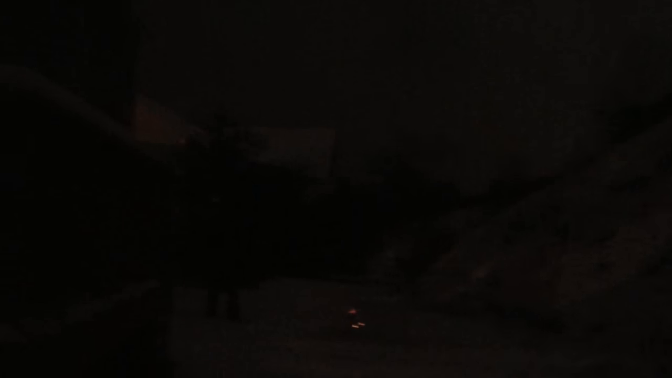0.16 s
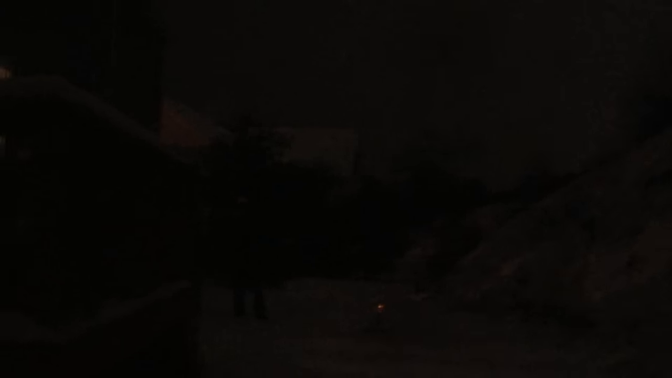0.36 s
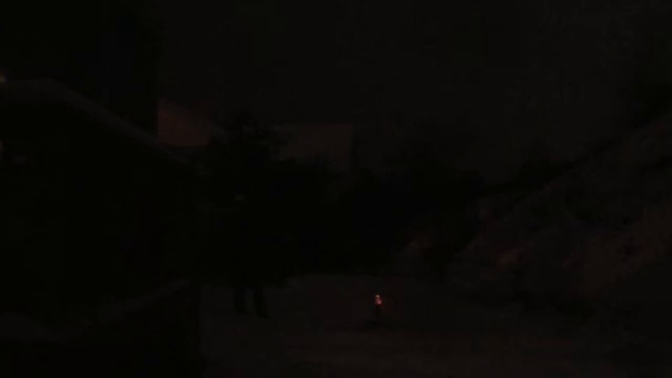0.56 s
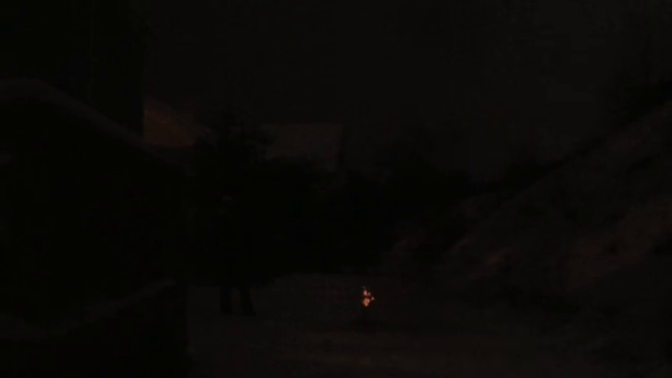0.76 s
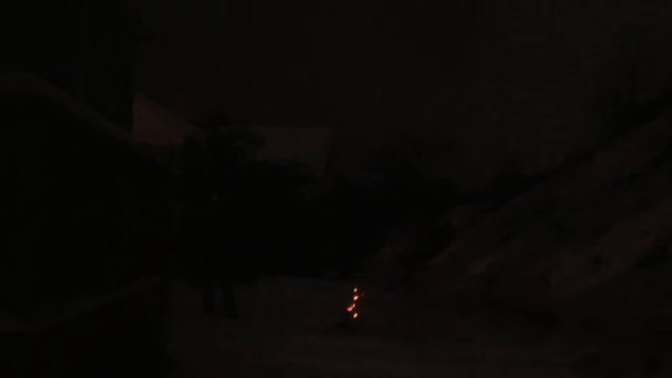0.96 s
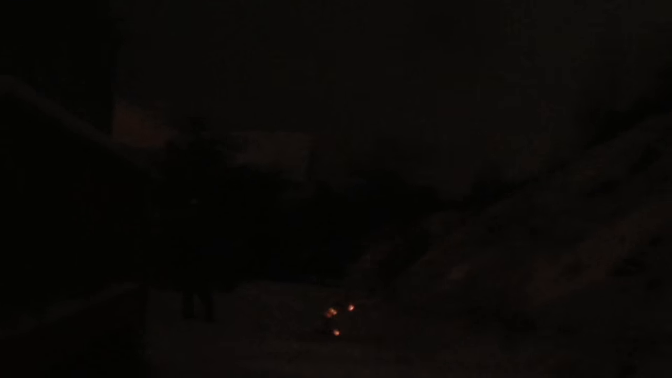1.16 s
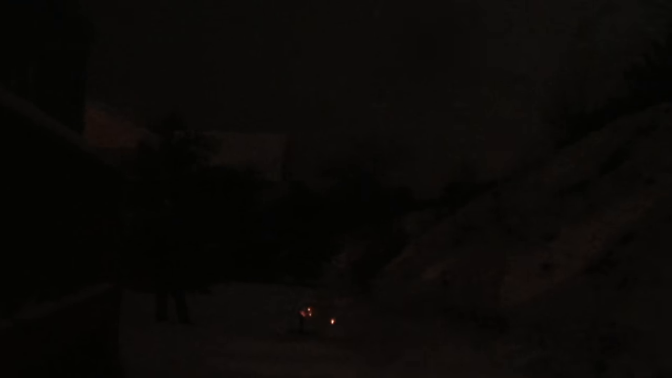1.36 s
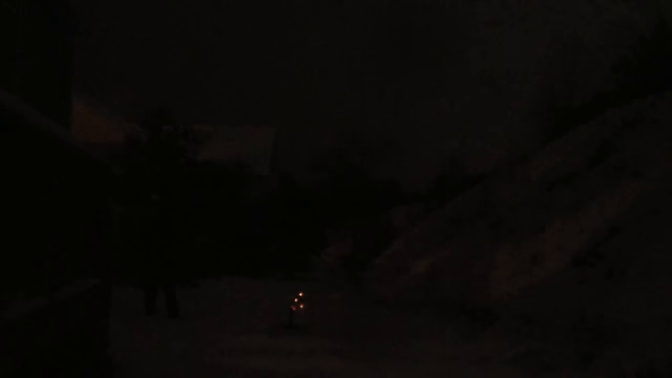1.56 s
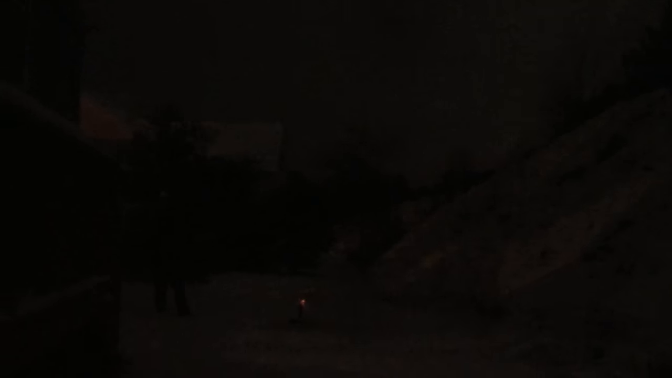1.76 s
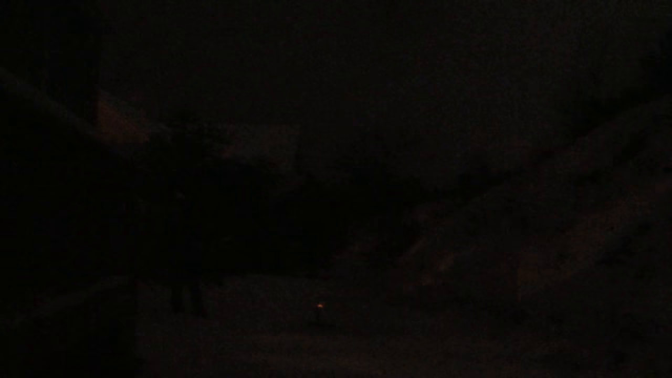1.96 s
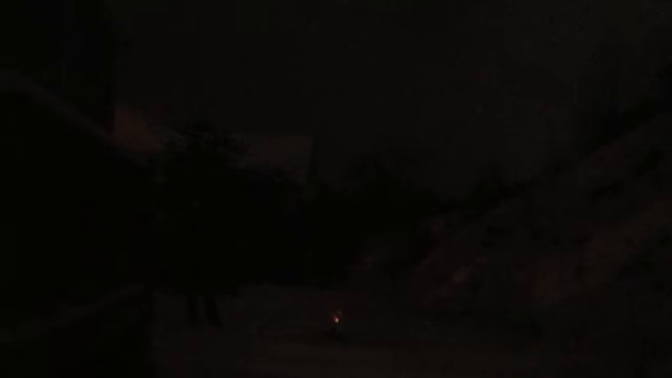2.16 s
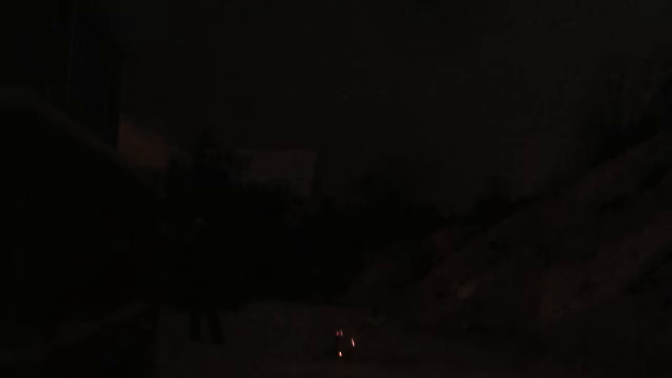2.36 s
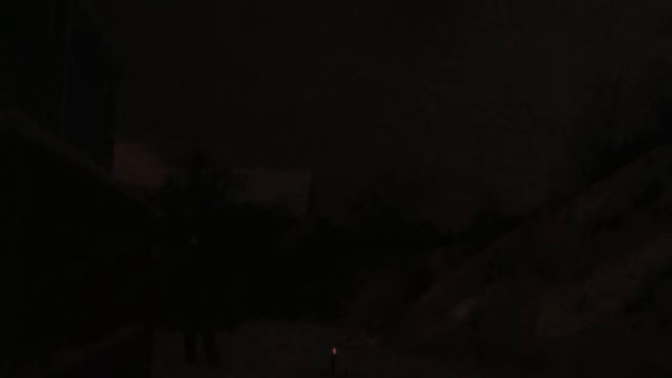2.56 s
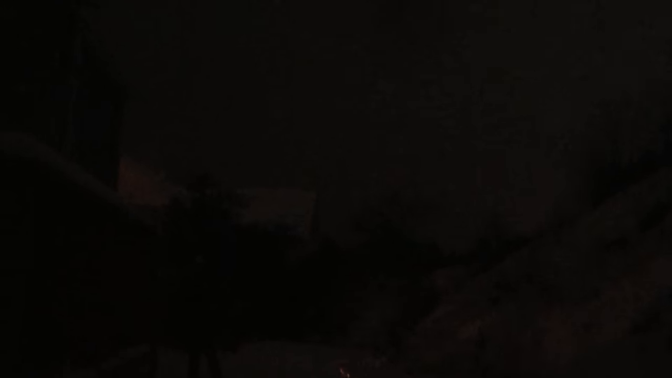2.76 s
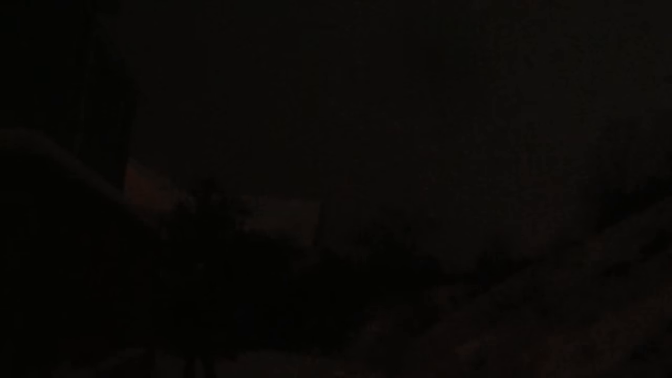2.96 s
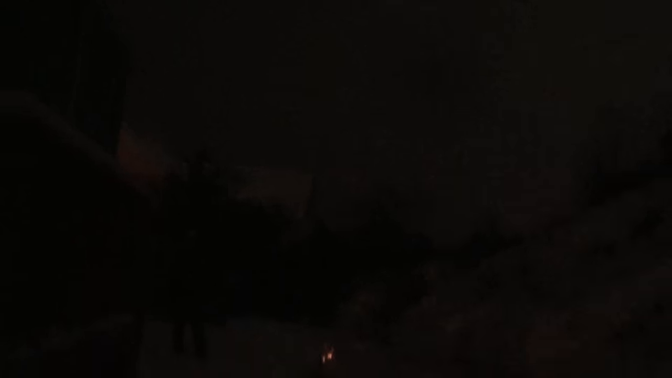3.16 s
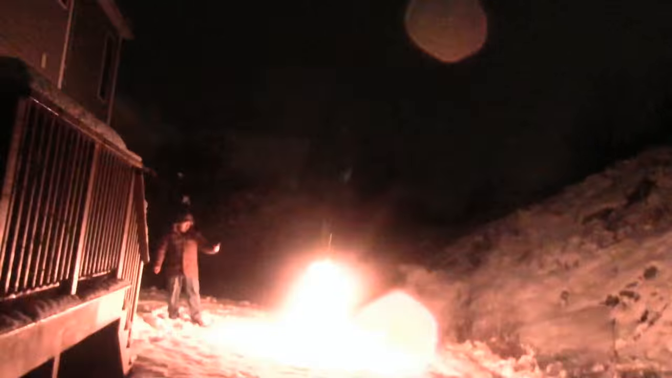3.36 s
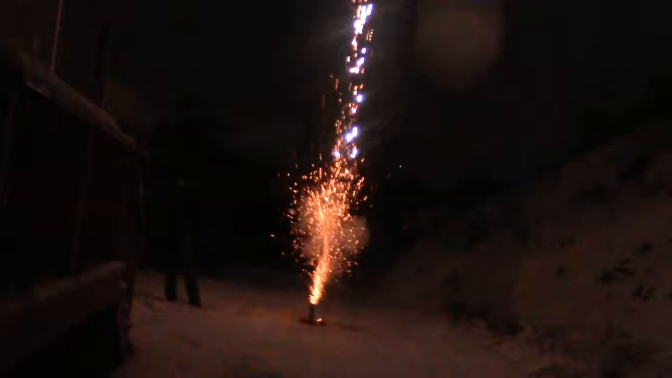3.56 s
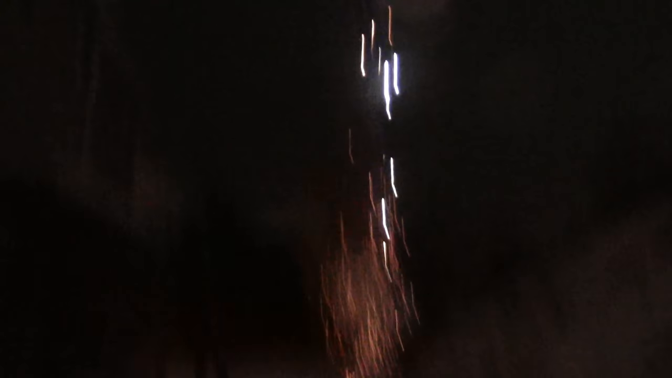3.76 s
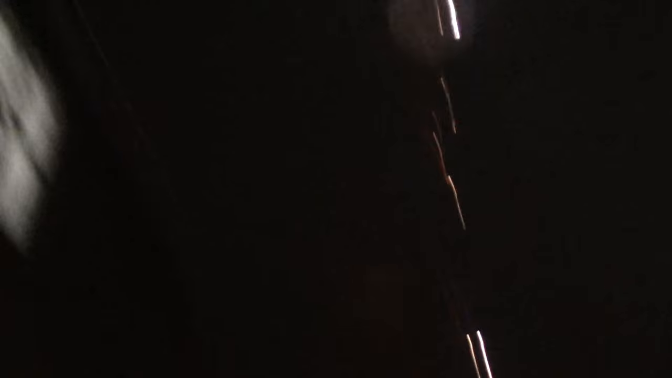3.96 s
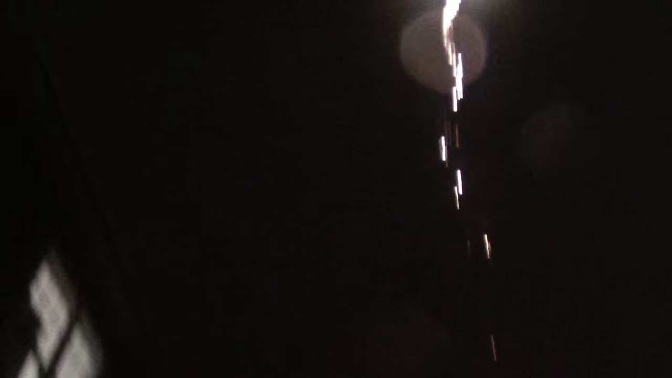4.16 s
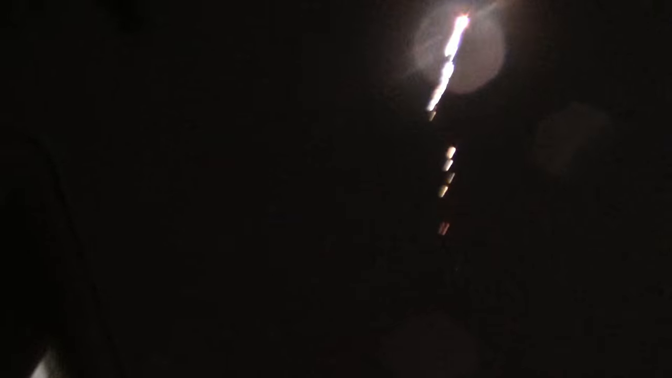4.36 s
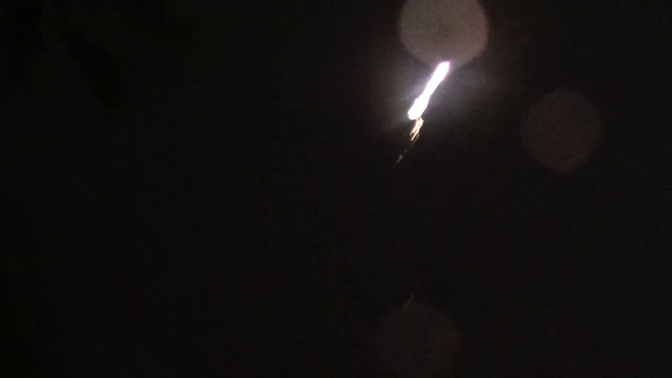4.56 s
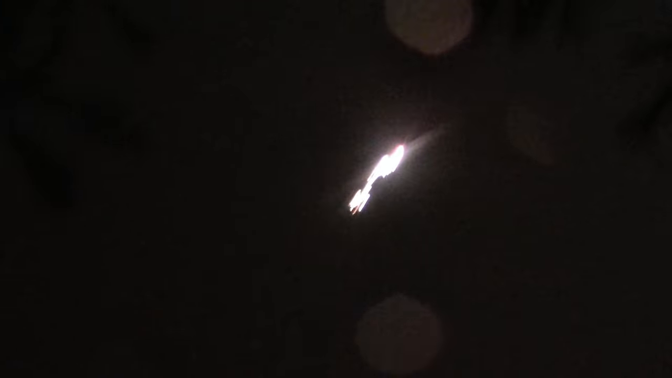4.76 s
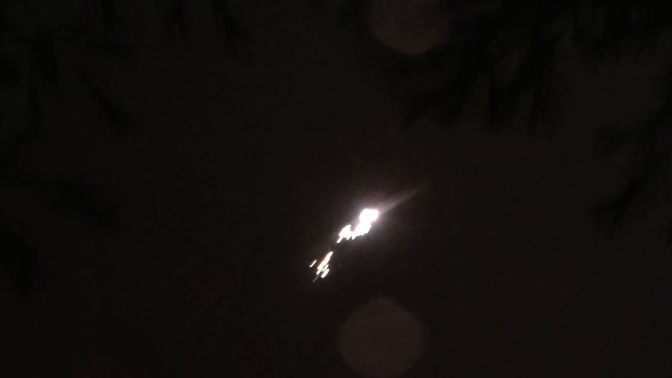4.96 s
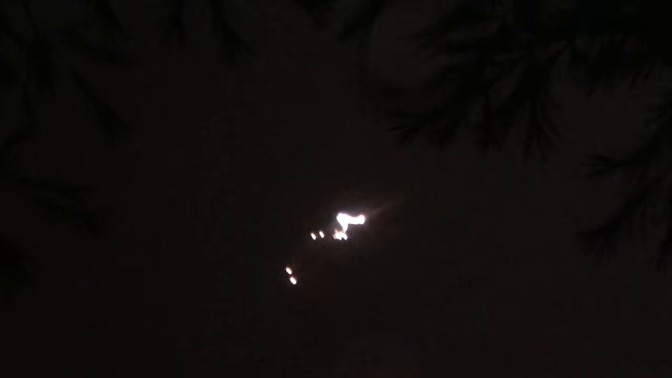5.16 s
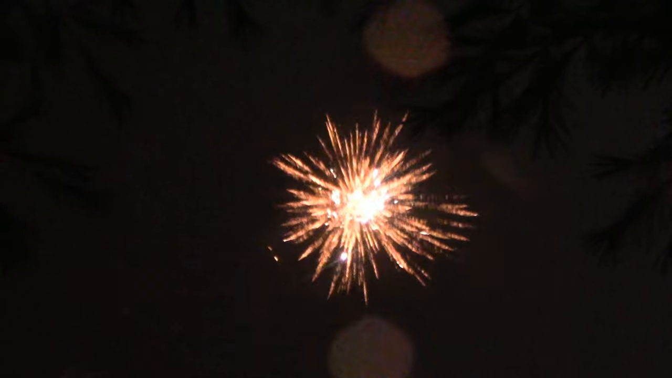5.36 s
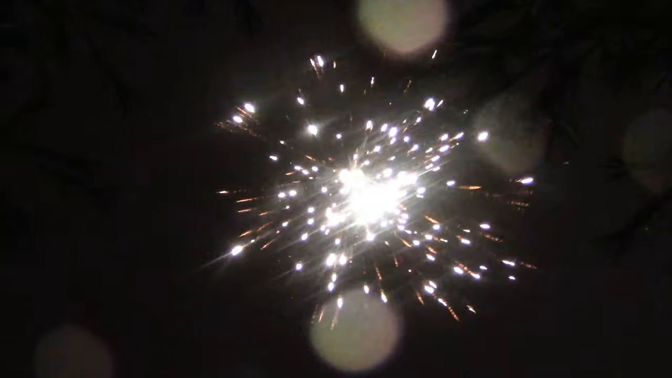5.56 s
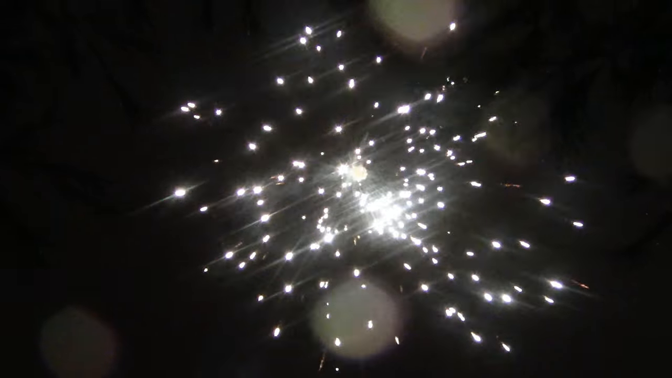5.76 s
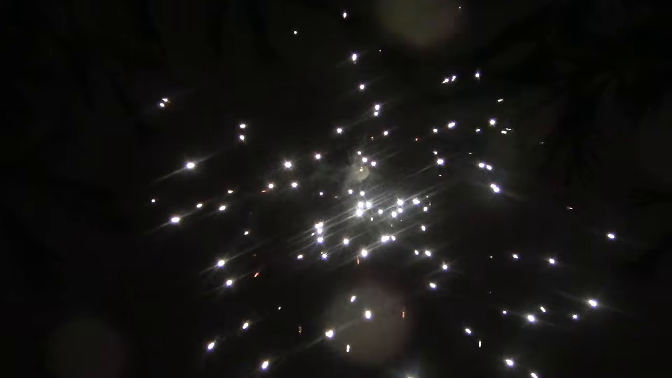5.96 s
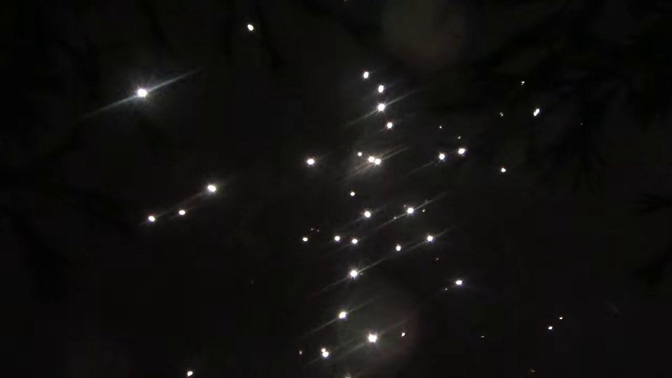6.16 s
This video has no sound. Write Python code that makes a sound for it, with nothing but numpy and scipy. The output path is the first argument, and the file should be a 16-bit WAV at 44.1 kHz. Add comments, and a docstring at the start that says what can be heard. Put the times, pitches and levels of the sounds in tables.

```python
"""Firework on a snowy village lane

Night. A dog barks far off; sleeves rustle (grainy noise) and fingers knock on the camera (damped swings).
The fuse hisses down into the mortar (noise through its air resonances) and bright sparks snap.
The lift charge cracks (gas noise and ringing tones) and slaps back from fences and houses.
Two seconds later the shell bursts (N-shaped wave), overloads the microphone and rolls round the hills."""
import sys
import numpy as np
from scipy import signal
from scipy.fft import rfft, irfft, next_fast_len
from scipy.io import wavfile
from scipy.ndimage import map_coordinates

SR = 44100
rng = np.random.default_rng(int(sys.argv[2]) if len(sys.argv) > 2 else 0)


def master(y):
    """Save y as 16-bit WAV."""
    cut = np.clip(np.atleast_2d(y).T, -1, 1)
    pcm = np.round(cut * 32767)  # scale
    wavfile.write(sys.argv[1], SR, pcm.astype(np.int16))


N = 274302
T = np.arange(N) / SR   # time in seconds


def from_db(db):
    """Turn decibels into a gain."""
    return 10 ** (np.asarray(db) / 20)


def rms_one(x):
    """Scale to unit power."""
    return x / np.sqrt(np.mean(x ** 2) + 1e-20)


def cut(x, hz, kind, order=2):
    """Low- or high-pass filter that works forward in time."""
    sections = signal.butter(order, np.clip(hz, 10, .45 * SR), kind, fs=SR, output="sos")
    return signal.sosfilt(sections, x + 1e-18)


def smooth_low(x, hz, order):
    """Low-pass that runs forward and backward, so it adds no delay."""
    return signal.sosfiltfilt(signal.butter(order, hz, fs=SR, output="sos"), x)


def colour(x, spectrum):
    """Give a steady noise a spectrum and unit power."""
    hz, db = np.transpose(spectrum)
    size = next_fast_len(N)
    bins = np.maximum(np.arange(size // 2 + 1) * SR / size, 1)
    gain = from_db(np.interp(np.log(bins), np.log(hz), db))
    return rms_one(irfft(rfft(x, size) * gain, size)[:N])


def jumpy_gain(depth_db, per_s):
    """Gain that wanders between random values, per_s of them each second."""
    steps = rng.standard_normal(N)
    return from_db(depth_db * np.interp(T * per_s, np.arange(N), steps))


def grainy(depth_db, per_s):
    """White noise whose strength jumps about at random."""
    return rms_one(rng.standard_normal(N) * jumpy_gain(depth_db, per_s))


def resonate(x, hz, width):
    """One resonance with gain 1 on top; hz and width in Hz."""
    r = np.exp(-np.pi * width / SR)
    feedback = [1, -2 * r * np.cos(2 * np.pi * hz / SR), r * r]
    return signal.lfilter(np.array([1, 0, -1]) * (1 - r * r) / 2, feedback, x)


def resonate_twice(x, hz, width, second_width):
    """Two resonances at one pitch, for steeper sides."""
    return resonate(resonate(x, hz, width), hz, second_width)


def add(out, s, sound):
    """Mix a short sound in at time s."""
    i = int(np.clip(round(s * SR), 0, N - 1))
    out[i:i + len(sound)] += sound[:N - i]


def thud(db, hz, cycles):
    """A heavily damped push that swings for a cycle or two."""
    t = T[:SR // 10]
    age = t * hz / cycles
    envelope = 2 * np.e * age * np.exp(-2 * age)
    return from_db(db) * -np.sin(2 * np.pi * hz * t) * envelope


def swell(start, length, attack, release, arch_db):
    """Gain of one gesture: it sets in, arches to its middle and dies away."""
    age = T - start
    skirts = np.minimum(age, 0) / attack - np.maximum(age - length, 0) / release
    arch = np.sin(np.pi * np.clip(age / length, 0, 1))
    return np.exp(np.maximum(skirts, -20)) * from_db(arch_db * (arch - 1))


def echoes(rows, build_s):
    """Gain of scattered sound: each reflecting area builds up, holds and fades; their powers sum."""
    power = 0
    for s, db, hold, fade_db_per_s in rows:
        fading = np.maximum(T - s - build_s - hold, 0)
        build = np.clip((T - s) / build_s, 0, 1)
        power = power + (build * from_db(db - fade_db_per_s * fading)) ** 2
    return np.sqrt(power)


def scatter(spectrum, middle_s, dulling_db, bass_loss_db, grain_db, clump_db):
    """Countless small echoes in bunches; later ones crossed more air and snow and lost treble and deep bass."""
    rest = colour(grainy(grain_db, per_s=340), spectrum)
    rest = rms_one(rest * jumpy_gain(clump_db, per_s=70))   # the echoes arrive in bunches
    out = 0
    late = np.clip(T - middle_s, -.3, .7)   # seconds before or after the middle
    for edge in 125 * 2 ** np.arange(7):   # octave bands, in Hz
        band = smooth_low(rest, edge * np.sqrt(2), order=3)
        loss = dulling_db * (np.sqrt(edge / 700) - 1) + bass_loss_db * (125 / edge) ** 2   # dB per s
        out = out + band * from_db(-loss * late)
        rest = rest - band
    # what lies above the bands fades like the top band
    return out + rest * from_db(-loss * late)


def burst(bass_edge_hz=230, thump_db=-18, thump_hz=70, thump_s=0.015, crack_db=-4, crack_s=0.002,
          roll_db=0.68, ground_s=0.00173, ground_share=0.088):
    """An N-shaped pressure wave with a tearing crack and a deep thump, then the long roll of the hills."""
    # The burst and its first reflections. Each row: start in seconds, level in dB before filtering,
    # length of the pressure wave in seconds, treble edge in Hz.
    waves = [(5.3063, 27.5, 0.0016, 4900), (5.3156, 4.5, 0.0034, 900), (5.3297, 0, 0.003, 900),
             (5.385, -12, 0.0061, 900), (5.622, -8.5, 0.00235, 2000), (5.726, -12, 0.0014, 1100),
             (5.799, -12, 0.0017, 1200)]
    # Colour of the roll. Each row: frequency in Hz, relative level in dB per Hz.
    roll_colour = [(24, -66), (40, -38), (113, -33.5), (232, -8.5), (325, -1.5), (413, -2.5), (501, -1),
                   (915, -12), (1190, -13), (2080, -18.5), (2290, -19.5), (3280, -26), (5310, -34),
                   (7800, -42.5), (12600, -61), (16400, -93), (22000, -120)]
    # The burst scattered by the ground, the near slope and two far ridges. Each row: arrival in seconds,
    # level in dB before roll_db, hold in seconds, fade in dB per second.
    roll_echoes = [(5.295, -11, 0.0045, 119), (5.36, -11, 0.24, 53), (5.788, -16, 0.017, 36),
                   (5.93, -27, .05, 21)]
    burst_s = waves[0][0]
    out, t = np.zeros(N), T[:SR // 10]
    for s, db, length, edge_hz in waves:
        n_wave = from_db(db) * (1 - 2 * t / length) * (t < length)
        add(out, s, cut(n_wave, edge_hz, "low"))
    out = cut(out, bass_edge_hz, "high")
    tearing = rms_one(cut(rng.standard_normal(len(t)), 4000, "low", order=1))
    crack = from_db(crack_db) * tearing * np.exp(-t / crack_s)
    thump = from_db(thump_db) * np.sin(2 * np.pi * thump_hz * t) * np.exp(-t / thump_s)
    add(out, burst_s, crack - thump)
    hills = scatter(roll_colour, middle_s=5.58, dulling_db=1.5, bass_loss_db=23, grain_db=1.25, clump_db=1.5)
    # echoes arrive twice: straight, and glancing off the ground
    hills = hills + ground_share * np.interp(T - ground_s, T, hills)
    return out + from_db(roll_db) * echoes(roll_echoes, build_s=0.011) * hills * (T > burst_s)


def lift(gas_db=-4, lane_db=-1, ring_db=3, bass_edge_hz=240, snow_hz=9500, smear_db=-8, smear_s=0.0022,
         boom_db=-12.5, boom_hz=102, boom_loss_db_per_s=39):
    """A gush of gas rings the mortar; walls throw it back, each smeared and dulled in its own way."""
    # The lift charge and its echoes. Each row: start in seconds, level in dB before filtering,
    # fading time of the gas in seconds, treble edge in Hz.
    shots = [(3.343, 8.5, 0.0013, 4100), (3.353, -5.5, 0.0098, 10000), (3.359, 0, 0.0022, 7500),
             (3.490, -6.5, 0.0058, 4030), (3.538, -4, 0.0032, 3500), (3.568, -5, 0.0024, 2500),
             (3.574, -4, 0.0011, 2000)]
    # Ringing of the mortar. Each row: pitch in Hz, level in dB before ring_db,
    # time to fade by 60 dB in seconds.
    ring_tones = [(485, -22.5, 0.15), (1210, -17, 0.025), (1750, 2, 0.0059), (2760, -7, 0.0086)]
    # Dull low thumps of the shot, the first almost with it, the later ones as echoes.
    # Each row: start in seconds, peak level in dB of the envelope, pitch in Hz.
    dull_thumps = [(3.346, -16, 480), (3.3669, -11, 366), (3.430, -5, 372), (3.462, -8.5, 390),
                   (3.573, -14.5, 420), (3.718, -23, 169), (3.952, -15.5, 477), (3.970, -21, 503)]
    # Colour of the lane's echoes. Each row: frequency in Hz, relative level in dB per Hz.
    lane_colour = [(24, -67), (40, -81.5), (84, -18.5), (154, -19.5), (191, -12), (221, -20), (375, -3.5),
                   (539, -6.5), (669, -7), (915, -10.5), (1630, -7.5), (2080, -11), (6750, -26),
                   (10400, -38.5), (12600, -43), (16400, -79), (22000, -120)]
    # The shot scattered by fences, houses and the far end of the lane. Each row: arrival in seconds,
    # level in dB before lane_db, hold in seconds, fade in dB per second.
    lane_echoes = [(3.335, -18.5, .02, 51), (3.412, -14.5, 0.057, 123), (3.53, -17.5, 0.058, 48),
                   (3.945, -32, 0.016, 25), (4.36, -39, .05, 13)]
    shot_s = shots[0][0]
    out, t = np.zeros(N), T[:SR // 10]
    ring = -sum(from_db(ring_db + db - 60 * t / t60) * np.sin(2 * np.pi * hz * t)
                for hz, db, t60 in ring_tones)
    for s, db, length, edge_hz in shots:
        gas = from_db(gas_db) * rng.standard_normal(len(t)) * np.exp(-t / length)
        # far, rough surfaces spread the ring over a few milliseconds
        far = np.clip((s - shot_s) / 0.056, 0, 1)
        spread = rms_one(signal.fftconvolve(rng.standard_normal(2 * len(t) - 1), ring, "valid"))
        spread = spread * t / smear_s * np.exp(1 - t / smear_s)
        shot = ring + gas + from_db(smear_db) * spread * far
        add(out, s, from_db(db) * cut(shot, edge_hz, "low", order=1))
    out = cut(cut(out, bass_edge_hz, "high"), snow_hz, "low", order=3)
    for s, db, hz in dull_thumps:
        # a deep swing goes with each thump, weaker in the later ones
        deep_db = db + boom_db - boom_loss_db_per_s * (s - shot_s)
        add(out, s, thud(db, hz, cycles=1.46) + thud(deep_db, boom_hz, cycles=1.2))
    lane = scatter(lane_colour, middle_s=3.47, dulling_db=13.5, bass_loss_db=1, grain_db=1.0, clump_db=1.35)
    lane = cut(lane, 106, "high", order=1)
    return out + from_db(lane_db) * echoes(lane_echoes, build_s=0.0098) * lane * (T > shot_s)


def fuse(waver=0.00826, whistle_hz=1840, whistle_width_hz=150):
    """The sputtering fuse blows the mortar's air resonances, which waver with the hot gas inside."""
    # Air resonances of the mortar. Each row: pitch in Hz, basic width in Hz, relative level in dB.
    mortar = [(1115, 55, 10), (1777, 55, 7.5), (2810, 78, 1.5), (3470, 240, -2.5), (6000, 260, -6),
              (6560, 300, -15), (7850, 1400, -16.5), (8700, 300, -35)]
    # Spurts of the fuse. Each row: start in seconds, length in seconds, hiss level in dB,
    # whistle level in dB (both at the top of the arch).
    spurts = [(1.40, 0.3, -56, -54), (1.977, 0.032, -63, -47), (2.59, 0.053, -55, -51),
              (2.7, 0.11, -54, -55), (2.83, 0.13, -49, -57), (3.041, 0.094, -42.5, -58),
              (3.19, 0.034, -41.5, -55), (3.257, .08, -46.5, -47)]
    jet = grainy(1.8, per_s=110)
    pipe = 0
    for k, (hz, width, db) in enumerate(mortar):
        # neighbouring resonances have opposite signs
        pipe = pipe + (-1) ** k * from_db(db) * resonate_twice(jet, hz, 1.1 * width, 3 * width)
    # reading the noise at an uneven speed makes its pitches waver
    speed = 1 + waver * rms_one(cut(rng.standard_normal(N), 22.2, "low"))
    hiss = rms_one(map_coordinates(pipe, [np.cumsum(speed)], order=3))
    whistle = resonate_twice(rng.standard_normal(N), whistle_hz, whistle_width_hz, 2 * whistle_width_hz)
    whistle = rms_one(whistle)
    out = 0
    for s, length, hiss_db, whistle_db in spurts:
        gain = swell(s, length, attack=0.0093, release=0.017, arch_db=3.5)
        out = out + gain * (from_db(hiss_db) * hiss + from_db(whistle_db) * whistle)
    return out


def sparks():
    """Sparks and embers snap: thin and bright, each ringing briefly at its own pitch."""
    # Each row: start in seconds, peak level in dB, pitch in Hz, width of the resonance in Hz.
    snaps = [(2.72, -37, 6850, 4000), (3.249, -42, 2500, 2950), (3.331, -25, 1300, 600),
             (3.369, -14, 4370, 900), (3.476, -9.5, 4640, 350), (4.077, -40, 8000, 4000),
             (4.517, -43, 7500, 3000), (4.8193, -38, 8000, 2420), (4.903, -49, 9000, 3000)]
    out, t = np.zeros(N), T[:SR // 20]
    for s, db, hz, width in snaps:
        snap = resonate(rng.standard_normal(len(t)) * np.exp(-t / 0.0026), hz, width)
        add(out, s, from_db(db) * snap / np.abs(snap).max())
    return out


def knocks(scuff_s=0.0026, scuff_hz=2400, scuff_gain_db=-5, bass_edge_hz=150, case_db=-13, case_t60=0.055):
    """Each touch rocks the damped camera case, which rattles on briefly; skin scuffs on it."""
    # Fingers on the camera. Each row: start in seconds, level in dB before the bass cut,
    # pitch of the case in Hz, scuff level in dB before scuff_gain_db.
    touches = [(0.359, -17.5, 590, -23.5), (0.440, -16.5, 516, -26), (0.5703, -11, 310, -25.5),
               (0.583, -14.5, 479, -30), (0.5948, -11.5, 423, -31), (0.832, -27, 497, -25),
               (0.882, -17, 546, -25), (0.918, -18.5, 540, -25), (0.953, -24.5, 503, -31),
               (1.035, -15.5, 424, -30.5), (1.051, -16, 487, -34), (1.061, -20, 450, -32.5),
               (1.829, -17, 1100, -31), (2.0317, -2.5, 587, -21), (2.043, -12.5, 544, -35),
               (2.109, -16.5, 313, -28), (2.112, -17, 1090, -30), (2.182, -16.5, 670, -32),
               (2.305, -28, 1100, -32.5), (2.501, -24, 610, -24.5)]
    out, t = np.zeros(N), T[:SR // 10]
    for s, db, hz, scuff_db in touches:
        skin = cut(rng.standard_normal(len(t)), scuff_hz, "low", order=1)
        skin = rms_one(cut(cut(skin, 2100, "low", order=1), 250, "high"))
        scuff = from_db(scuff_db + scuff_gain_db) * skin * t / scuff_s * np.exp(1 - t / scuff_s)
        rattle = rms_one(resonate(rng.standard_normal(len(t)), hz, hz))
        rattle = rattle * from_db(db + case_db - 60 * t / case_t60) / 2
        add(out, s, thud(db, hz, cycles=0.66) + scuff + cut(rattle, 2400, "low"))
    return cut(out, bass_edge_hz, "high")


def sleeves(gain_db=-1, sheen_hz=4500):
    """Cloth fibres catch and slip in dense tiny grains; each stroke has its own share of treble."""
    # Colour of the cloth. Each row: frequency in Hz, relative level in dB per Hz.
    cloth = [(180, -45), (300, -5.5), (437, -3.5), (495, -9.5), (830, -5), (1390, -2.5), (2770, -10),
             (3390, -15), (11300, -28), (12600, -33), (16400, -64), (22000, -120)]
    # Sleeve strokes. Each row: start in seconds, length in seconds, level in dB before gain_db,
    # extra treble in dB.
    strokes = [(0, 0.041, -34.5, 0.5), (.06, 0.047, -38.5, -10), (0.127, 0.078, -32.5, -4.5),
               (0.223, 0.094, -36.5, -4), (0.318, 0.07, -34.5, -8), (0.411, 0.056, -36, -7),
               (0.592, 0.065, -43.5, -2), (0.687, 0.1, -38.5, 3.5), (0.819, 0.12, -38, 3.5),
               (1.834, 0.06, -32, 1), (2.32, .11, -30.5, -11.5), (4.408, .01, -36, -11),
               (4.607, 0.051, -41, -2)]
    fibres = colour(grainy(1.8, per_s=830), cloth)
    body = smooth_low(fibres, sheen_hz, order=1)
    sheen = fibres - body
    out = 0
    for s, length, db, sheen_db in strokes:
        # the arm is fastest in mid-stroke
        gain = from_db(gain_db + db) * swell(s, length, attack=.013, release=0.014, arch_db=3)
        out = out + gain * (body + from_db(sheen_db) * sheen)
    return out


def dog(bark_s=.249, bark_db=-24.5, bark_hz=428.8, scoop_hz=29.84, scoop_s=0.014, rough=0.028, flutter=0.42,
        mouth_lag_s=0.023, wall_delay_s=.108, wall_db=-8, echo_db=-10, echo_t60=0.85):
    """One far, hollow bark: wavering overtones, drawn out by echoes between the houses."""
    # Overtones of the voice. Each row: multiple of the pitch, level in dB relative to bark_db.
    partials = [(1, 1), (2, -7.5), (3, -36)]
    # the pitch scoops up and settles as the mouth opens
    scoop = scoop_hz * np.exp(-np.clip((T - bark_s) / scoop_s, -.8, 20))
    pitch = (bark_hz - scoop) * (1 + rough * rms_one(cut(rng.standard_normal(N), 140, "low")))
    phase = 2 * np.pi * np.cumsum(pitch) / SR
    bark = 0
    for k, (_, db) in enumerate(partials):
        # the overtones come after the fundamental
        effort = swell(bark_s + k * mouth_lag_s, 0.038, attack=0.021, release=0.053, arch_db=3)
        shake = 1 + flutter * rms_one(cut(rng.standard_normal(N), 73, "low"))
        bark = bark + from_db(bark_db + db) * effort * shake * np.sqrt(2) * np.sin((k + 1) * phase)
    t = T[:SR // 2]
    houses = rms_one(rng.standard_normal(len(t)) * from_db(-60 * t / echo_t60) * (t > .04)) / np.sqrt(len(t))
    # two bounces between house fronts, each weaker by wall_db
    wall = sum(from_db(k * wall_db) * np.interp(T - k * wall_delay_s, T, bark) for k in (1, 2))
    wall = cut(wall, 900, "low")
    return bark + wall + from_db(echo_db) * signal.fftconvolve(bark, houses)[:N]


def hum(db=-53, hz=224, width_hz=9):
    """A faint, wavering drone from far away: noise through a narrow resonance."""
    return from_db(db) * rms_one(resonate_twice(rng.standard_normal(N), hz, width_hz, 3 * width_hz))


def night_air(db=-42):
    """Still night air: steady, coloured noise."""
    # Each row: frequency in Hz, relative level in dB per Hz.
    air_colour = [(18, -65), (30, -44), (140, -11.5), (216, -3), (376, -3.5), (449, 2.5), (484, -4.5),
                  (536, 4), (608, -3), (673, -5.5), (934, -8), (1850, -15), (2840, -20.5), (5620, -27.5),
                  (12600, -39), (16400, -69), (22000, -120)]
    return from_db(db) * colour(rng.standard_normal(N), air_colour)


def scene():
    """All sources at one microphone."""
    firework = burst() + lift() + fuse() + sparks()
    return (firework + knocks() + sleeves() + dog() + hum() + night_air())[None]


def record(dry):
    """Loud bangs overload the input and are rounded off; then the treble above 12.7 kHz is cut."""
    clipped = dry / (1 + (dry / .97) ** 8) ** (1 / 8)
    return smooth_low(clipped, 12700, order=20)


dry = scene()
out = record(dry)
master(out)
```